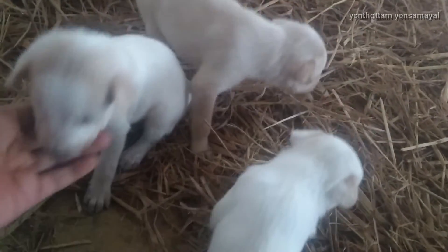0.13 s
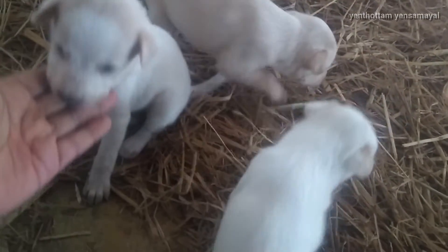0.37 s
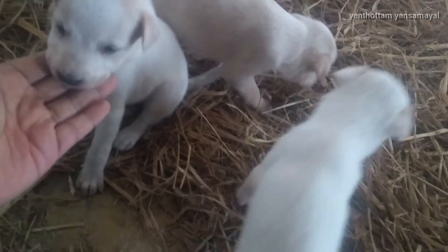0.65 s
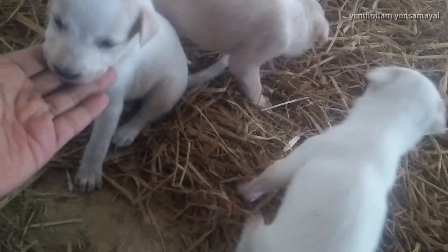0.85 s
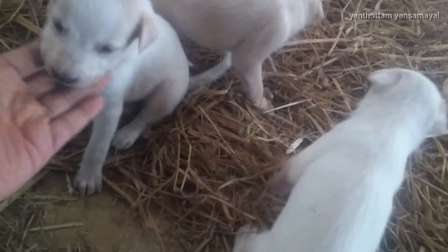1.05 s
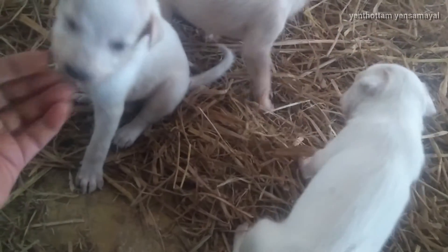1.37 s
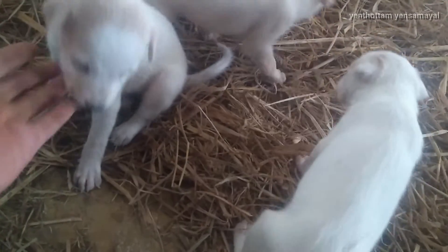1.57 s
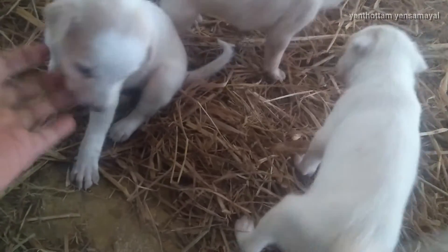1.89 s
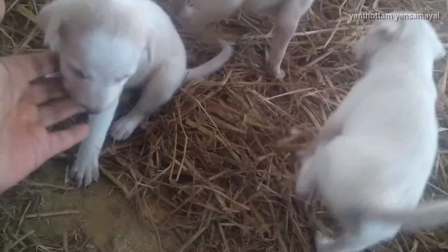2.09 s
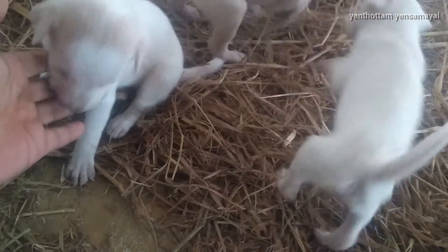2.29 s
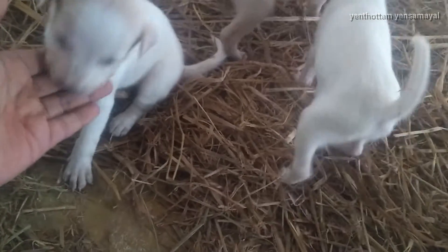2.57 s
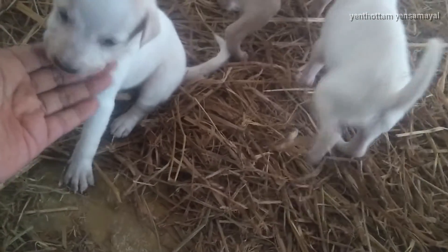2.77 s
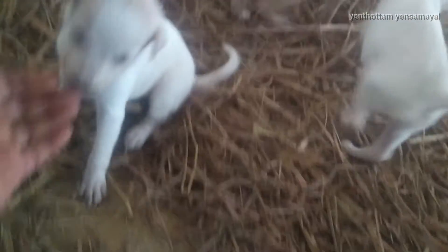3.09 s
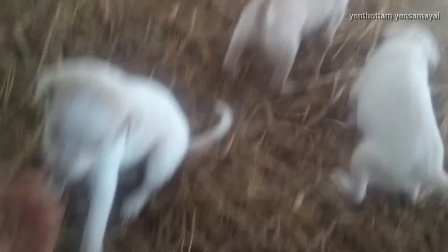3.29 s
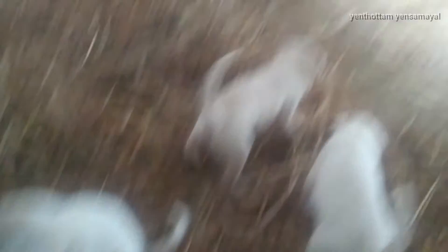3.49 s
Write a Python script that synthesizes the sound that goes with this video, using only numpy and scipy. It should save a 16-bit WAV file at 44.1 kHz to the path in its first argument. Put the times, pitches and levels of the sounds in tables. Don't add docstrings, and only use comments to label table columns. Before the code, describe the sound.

Puppies whine and yelp up close on straw: busy start, quiet middle with small yips, sharp squeals around two and a half seconds, then a dipping cry and a wavering last whine in a small shed.

```python
import sys
import numpy as np
from scipy import signal
from scipy.fft import rfft, irfft
from scipy.io import wavfile
from scipy.ndimage import uniform_filter1d

SR = 44100
rng = np.random.default_rng(int(sys.argv[2]) if len(sys.argv) > 2 else 0)


def transcribe(signal):
    frames = np.atleast_2d(signal).T
    limited = np.clip(frames, -1, 1)
    pcm = np.round(limited * 32767).astype(np.int16)
    wavfile.write(sys.argv[1], SR, pcm)


def convert_level_to_amplitude(level_db):
    exponent = np.asarray(level_db, float) / 20
    return 10 ** exponent


N = 160965


def on_log(table, hz):
    points = np.array(table, float)
    return np.interp(np.log(np.maximum(hz, 1)), np.log(points[:, 0]), points[:, 1])


def unit(x):
    return x / np.sqrt(np.mean(x ** 2))


def walk(rate_hz, size):
    k = max(int(SR / rate_hz), 2)
    noise = rng.standard_normal(size + 4 * k)
    return unit(uniform_filter1d(uniform_filter1d(noise, k), k))[:size]


def voice(out, start_s, hz, gain, tilt_db, rough, second_db, third_db):
    # pitch_hz, level_db
    throat = [(1000, 9.5), (2000, 7), (2800, 13), (4700, -9), (5700, -1.5), (7500, -1.5), (12000, -46)]
    jitter, jitter_hz, shimmer_hz = 0.03, 146, 214
    rough_growth = 0.8
    n = len(hz)
    pitch_wander, steady_wander, cross_wander = [walk(r, SR // 3)[:n] for r in (jitter_hz, shimmer_hz, shimmer_hz)]
    phase = 2 * np.pi * np.cumsum(hz * (1 + jitter * rough * pitch_wander)) / SR

    k = np.arange(1, 11)[:, None]
    harmonic_db = on_log(throat, k * hz) - on_log(throat, hz) + tilt_db * np.log2(k)
    harmonic_db = harmonic_db + second_db * (k == 2) + third_db * ((k == 3) + 0.5 * (k == 4))
    size = convert_level_to_amplitude(harmonic_db) * (k * hz < SR / 3)

    r = np.clip(rough * k ** rough_growth, 0, 1)
    wave = (np.sqrt(1 - r ** 2) + r * steady_wander) * np.sin(k * phase)
    wave = wave + r * cross_wander * np.cos(k * phase)
    sound = np.sqrt(2) * gain * (size * wave).sum(axis=0)
    return out + np.pad(sound, (int(start_s * SR), N))[:N]


def long_calls():
    # time_s, pitch_hz, level_db
    early = [
        [(.008, 789, -60.5), (.045, 848, -54), (.06, 927, -50), (.079, 922, -45), (.095, 904, -39.5),
         (.125, 906, -60), (.14, 864, -39.5), (.165, 892, -51.5), (.195, 900, -38.5)],
        [(.167, 1176, -43.5), (.185, 1223, -44), (.235, 1290, -42), (.276, 1244, -38.5), (.286, 1012, -28),
         (.294, 890, -35.5)],
        [(.3, 918, -62.5), (.36, 886, -49.5), (.41, 1087, -49), (.5, 1044, -47.5)],
        [(.505, 1000, -36.5), (.512, 1016, -29), (.532, 1007, -27.5), (.54, 866, -19), (.56, 888, -26.5),
         (.565, 855, -40.5)],
    ]
    middle = [
        [(.652, 653, -47.5), (.678, 655, -38), (.694, 662, -26.5), (.71, 768, -33), (.728, 791, -31),
         (.762, 810.5, -33), (.78, 784, -41.5)],
        [(1.187, 739, -41.5), (1.208, 765, -27), (1.223, 752, -42), (1.228, 636, -32.5), (1.242, 644, -32.5),
         (1.258, 531, -40)],
        [(1.938, 1203, -70), (2.0, 1226, -41.5), (2.018, 1180, -46.5), (2.03, 787, -44.5)],
        [(2.247, 985, -46.5), (2.265, 1025, -31), (2.278, 790, -31), (2.288, 703, -47.5)],
    ]
    squeals = [
        [(2.49, 1316, -43), (2.516, 1310, -37.5), (2.528, 1417, -23.5), (2.546, 1453, -19), (2.572, 1433, -22),
         (2.594, 1353, -33)],
        [(2.778, 1266, -42.5), (2.806, 1274, -29.5), (2.83, 1382, -25.5), (2.85, 1393, -32.5),
         (2.88, 1293, -37), (2.889, 1022, -40), (2.9, 993, -32.5)],
    ]
    late = [
        [(3.064, 1127, -43.5), (3.1, 1089, -39.5), (3.122, 1127, -29), (3.146, 1060, -37)],
        [(3.147, 1048, -33.5), (3.163, 977.5, -24), (3.18, 909, -21.5), (3.224, 997.4, -25),
         (3.276, 996.6, -27.5), (3.285, 925, -30.5)],
        [(3.447, 1173, -49.5), (3.48, 1139, -36.5), (3.51, 1244, -33.5), (3.54, 1188, -38), (3.58, 1129, -40.5),
         (3.65, 1198, -39)],
    ]
    # tilt_db per octave, roughness 0-1, second_db, third_and_fourth_db
    mouth = [(-5.5, .3, 0, -13), (-1, .08, 0, -22.5), (-5.5, 0.5, 2, -15), (-15, 0.12, 3.5, -9),
             (-22, 0.37, 2.5, 6), (-24, 0.34, 1.5, 7), (-14, .25, -6, 4), (-14.5, 0, -5, 4.5),
             (-4.5, 0.07, 0, 8), (-2, 0.12, 0.5, 1), (-4.5, 0.05, 0, -17), (-19.5, 0.11, 3, -10.5),
             (-4, .06, -1.5, -8)]
    effort = 0.04
    close_db = 18.5
    out = np.zeros(N)
    for rows, (tilt_db, rough, second_db, third_db) in zip(early + middle + squeals + late, mouth):
        time_s, pitch_hz, level_db = np.array(rows, float).T
        t = np.arange(time_s[0], time_s[-1], 1 / SR)
        edge = np.clip(np.minimum(t - time_s[0], time_s[-1] - t) / 0.0026, 0, 1)
        hz, db = [uniform_filter1d(np.interp(t, time_s, v), SR // 300, mode="nearest")
                  for v in (pitch_hz, level_db)]
        fallen = np.log2(hz / np.maximum.accumulate(hz))
        tilt = tilt_db + effort * (db - level_db.max()) + close_db * fallen
        out = voice(out, max(time_s[0], 0), hz, edge * convert_level_to_amplitude(db), tilt, rough, second_db, third_db)
    return out


def short_calls():
    # start_s, length_s, first_hz, last_hz, level_db
    notes = [(.228, 0.036, 775, 552, -46), (.455, 0.019, 784, 630, -42), (.558, 0.013, 787, 615, -40),
             (.942, 0.061, 1085, 1034, -49.5), (.942, 0.083, 557.3, 679, -51.5),
             (.962, 0.013, 572, 746, -37), (1.677, 0.11, 1162, 1158, -62),
             (1.737, 0.0255, 1090, 696, -54.5), (1.785, 0.031, 1623, 1566, -57.5),
             (2.18, 0.12, 1297, 1397, -51), (2.594, 0.02, 1268, 833, -47), (3.275, 0.013, 811, 606, -41),
             (3.295, 0.092, 1530, 1520, -65), (3.375, 0.085, 1515, 1460, -64),
             (3.465, 0.091, 832, 908, -43), (1.95, 0.098, 402.5, 395, -69.5),
             (2.81, 0.065, 403, 384.4, -65)]
    # start_s, length_s, first_hz, last_hz, level_db
    whistles = [
        (1.419, .037, 745, 765, -32.5),
        (1.21, .085, 2620, 2580, -51),
        (1.19, .07, 3900, 3850, -50),
        (2.297, .042, 3460, 3440, -46),
        (2.348, .1, 3450, 3340, -43),
        (2.59, .022, 2600, 2280, -33),
        (3.295, .06, 3020, 3050, -57),
        (3.39, .06, 2900, 2790, -53),
    ]
    # start_s, length_s, first_hz, last_hz, level_db
    whines = [(.765, .11, 3150, 3050, -59), (.942, .07, 2130, 2080, -60), (1.68, .07, 2330, 2350, -66),
              (1.82, .14, 1560, 1520, -70), (1.99, .27, 2400, 2800, -62), (2.02, .22, 1750, 1900, -67),
              (2.22, .06, 5650, 5600, -62), (3.12, .1, 4350, 4250, -62), (1.195, .08, 1950, 1850, -60),
              (1.422, .035, 1950, 1900, -58), (1.25, .07, 1150, 1000, -59), (1.8, .06, 430, 420, -68),
              (2.83, .08, 4150, 3950, -53), (2.6, .05, 2450, 2400, -51), (1.985, .015, 2300, 2200, -56),
              (2.16, .07, 2750, 2800, -60)]
    edge_share = 0.27
    out = np.zeros(N)
    for rows, tilt_db, rough in (notes, -18.5, 0.42), (whistles, -17, 0.24), (whines, -17, 0.9):
        for start_s, length_s, first_hz, last_hz, level_db in rows:
            u = np.linspace(0, 1, int(length_s * SR))
            ramp = np.clip(np.minimum(u, 1 - u) / edge_share, 0, 1)
            gain = np.sin(np.pi / 2 * ramp) ** 2 * convert_level_to_amplitude(level_db)
            hz = first_hz + (last_hz - first_hz) * u
            out = voice(out, start_s, hz, gain, tilt_db, rough, second_db=-5.5, third_db=-9)
    return out


def shed(x):
    t60_s, echo_db = 0.2, -15.5
    t = np.arange(SR // 2) / SR
    tail = rng.standard_normal((2, len(t))) * convert_level_to_amplitude(-60 * t / t60_s) * np.clip(t / 0.0055, 0, 1)
    tail = tail / np.sqrt((tail ** 2).sum(axis=1, keepdims=True)) * convert_level_to_amplitude(echo_db)
    return signal.fftconvolve(x[None], tail, axes=1)[:, :N]


def hiss(colour, flicker_db, snap_db):
    crackle = rng.standard_normal((4, N)) * convert_level_to_amplitude(snap_db * walk(300, N))
    f, _, cells = signal.stft(crackle, SR, nperseg=512)
    flicker = uniform_filter1d(rng.standard_normal(cells.shape[1:]), size=2, axis=0)
    flicker = unit(uniform_filter1d(flicker, size=7, axis=1))
    cells = cells * convert_level_to_amplitude(on_log(colour, f)[:, None] + flicker_db * flicker)
    return unit(signal.istft(cells, SR, nperseg=512)[1][:, :N])


def straw(t):
    # peak_s, rise_s, level_db
    rustles = [(0.072, .05, -58.5), (.24, 0.069, -46.5), (0.337, 0.016, -58.5), (0.526, 0.064, -52),
               (0.663, 0.012, -49.5), (0.683, 0.017, -49.5), (0.734, 0.041, -55), (0.988, 0.027, -63),
               (1.224, 0.056, -59), (1.346, 0.0054, -60.5), (1.394, 0.0096, -63.5), (1.435, 0.021, -60),
               (1.738, 0.056, -60.5), (1.797, 0.004, -52), (1.993, 0.039, -56), (2.196, 0.038, -64.5),
               (2.277, 0.073, -53.5), (2.435, 0.028, -44.5), (2.5, 0.059, -51), (2.578, 0.046, -41.5),
               (2.739, 0.031, -55.5), (2.824, 0.084, -50.5), (2.95, 0.017, -54), (3.092, 0.022, -63),
               (3.171, 0.066, -57), (3.402, 0.07, -54), (3.51, 0.083, -47.5)]
    # pitch_hz, level_db
    stalks = [(60, -11.5), (250, -11), (800, -13.5), (2000, 5.5), (3300, 2.5), (6000, 1), (10000, -7.5),
              (15000, -14)]
    rise_shape, fall_shape = 1.9, 1.43
    power = 0
    for peak_s, rise_s, level_db in rustles:
        away = np.abs((t - peak_s) / rise_s)
        loss_db = np.where(t < peak_s, 14 * away ** rise_shape, 5 * away ** fall_shape)
        power = power + convert_level_to_amplitude(level_db - loss_db) ** 2
    return np.sqrt(power) * hiss(stalks, flicker_db=3, snap_db=1.5)


def handling(t):
    # peak_s, length_s, level_db
    rubs = [
        (.13, 0.058, -82),
        (.5, .07, -77),
        (.72, .05, -73),
        (1.22, 0.048, -81),
        (2.52, .04, -87.5),
        (2.86, .05, -80),
        (3.16, 0.12, -74.5),
    ]
    centre_hz = 95
    band = signal.butter(2, [centre_hz / 1.4, centre_hz * 1.4], "band", fs=SR, output="sos")
    rub = unit(signal.sosfilt(band, rng.standard_normal((2, N))))
    return rub * sum(convert_level_to_amplitude(db) * np.exp(-((t - peak_s) / length_s) ** 2) for peak_s, length_s, db in rubs)


def hush():
    # pitch_hz, level_db
    floor = [(40, -1), (300, 1), (800, -3.5), (4000, -5), (15000, -16)]
    return convert_level_to_amplitude(-74) * hiss(floor, flicker_db=4, snap_db=0)


def ports(x, lead, side, colour=((1, 0),)):
    # pitch_hz, left_minus_right_db
    lean = [(500, .8), (2200, .3), (5000, -.3), (8000, -5), (11500, -9), (14000, -.3)]
    f = np.fft.rfftfreq(N, 1 / SR)
    lead_hz, half_turns = np.array(lead).T
    left = convert_level_to_amplitude(on_log(lean, f) / 2) * np.exp(0.5j * np.pi * side * np.interp(f, lead_hz, half_turns))
    return irfft(rfft(x) * convert_level_to_amplitude(on_log(colour, f)) * np.array([left, 1 / left]), N, axis=1)


def scene():
    # pitch_hz, lead_half_turns
    voice_lead = [(120, .8), (550, .08), (1500, .16), (2230, 1), (3350, 2), (4500, 3), (7000, 5.3),
                  (12200, 1.1)]
    # pitch_hz, lead_half_turns
    spread = [(0, 1), (2080, 2.95), (2380, 3.05), (4450, 5), (6900, 7), (8550, 8), (12800, 11), (15400, 13)]
    # pitch_hz, level_db
    near = [(6500, 0), (7500, -9), (12000, -9), (12800, 4), (14000, 0)]
    # pitch_hz, level_db
    alone = [(300, -4), (1200, -22), (2300, -24), (4500, -7), (6000, -4), (12800, 1), (14300, -12),
             (15400, -20)]
    t = np.arange(N) / SR
    dogs = long_calls() + short_calls()
    near_echo, far_echo = shed(dogs)
    noise = straw(t) + hush()
    voices = ports(dogs + near_echo, voice_lead, 1) + ports(convert_level_to_amplitude(0.5) * far_echo, voice_lead, -1)
    scattered = ports(noise[0], spread, 1, near) + ports(noise[1], spread, -1)
    scattered = scattered + ports(noise[2:], spread, 0, alone)
    return voices + scattered + handling(t)


def roll_off(x):
    return signal.sosfilt(signal.butter(12, 15570, fs=SR, output="sos"), x)


def record(dry):
    # start_s, length_s, depth_db
    dips = [
        (.63, .022, -12),
        (2.764, .012, -9),
    ]
    t = np.arange(N) / SR
    duck_db = sum(db * ((t > start_s) & (t < start_s + length_s)) for start_s, length_s, db in dips)
    top_cut = signal.ellip(8, 0.2, 60, 15520, fs=SR, output="sos")
    mix = signal.sosfilt(top_cut, dry) * convert_level_to_amplitude(uniform_filter1d(duck_db, SR // 100))
    return roll_off(mix)


dry = scene()
out = record(dry)
transcribe(out)
```